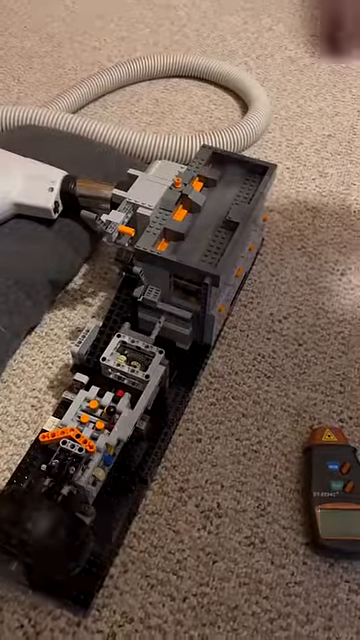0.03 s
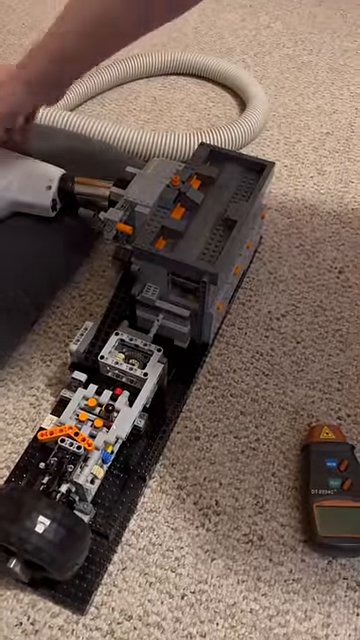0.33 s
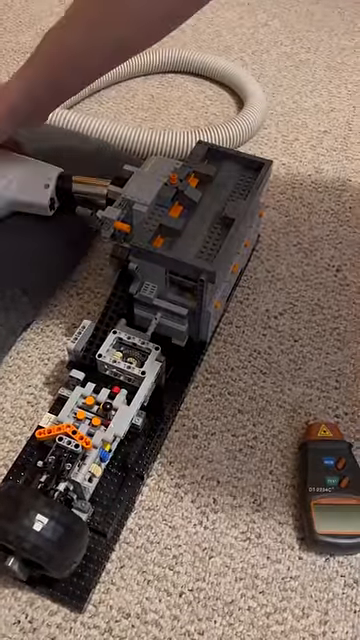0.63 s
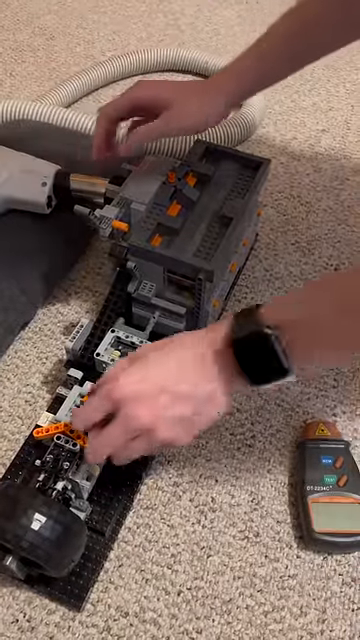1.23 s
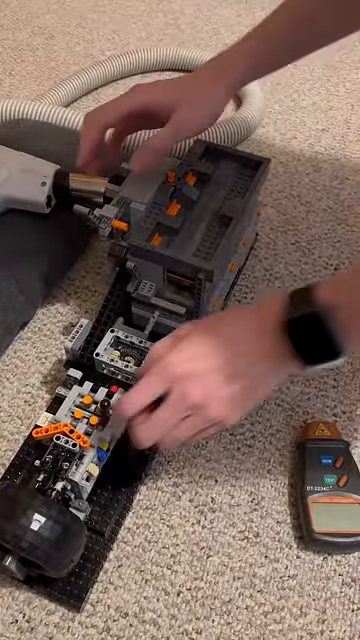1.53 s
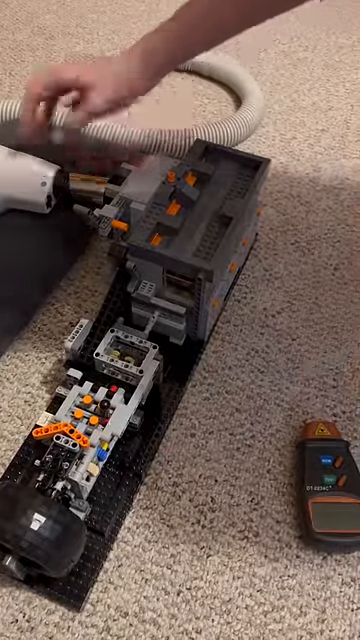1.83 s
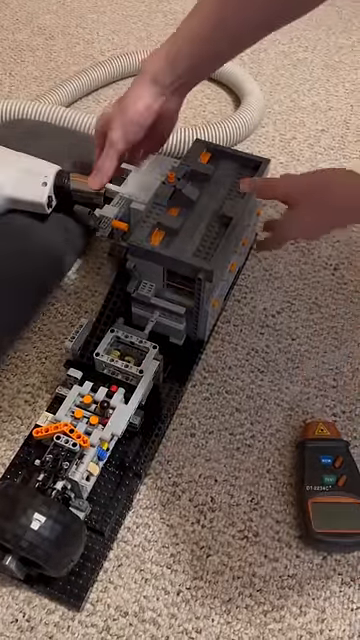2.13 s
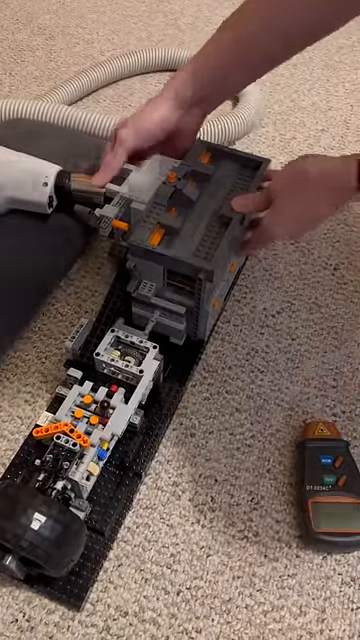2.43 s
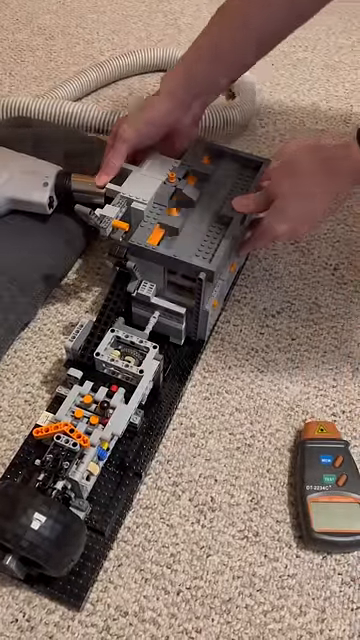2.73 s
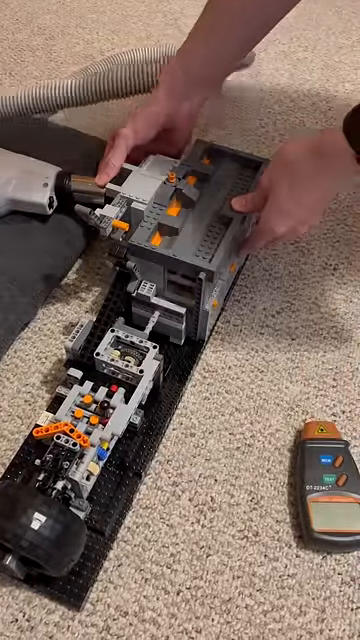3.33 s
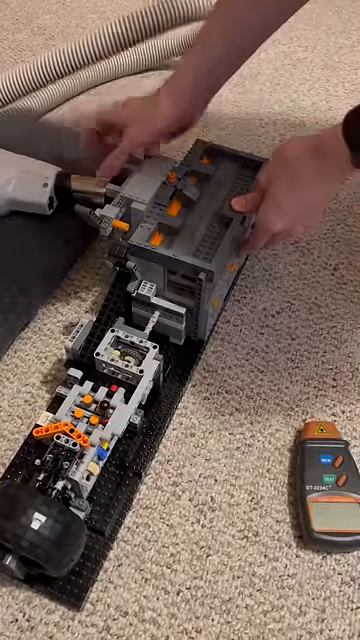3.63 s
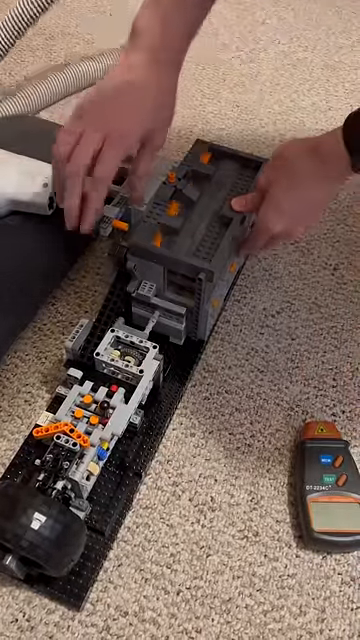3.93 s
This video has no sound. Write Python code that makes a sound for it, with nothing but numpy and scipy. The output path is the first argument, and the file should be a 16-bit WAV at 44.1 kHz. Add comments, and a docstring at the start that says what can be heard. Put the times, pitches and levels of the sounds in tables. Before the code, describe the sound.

A vacuum-driven toy brick engine hisses and starts up, clacking and chugging faster over rushing air.

```python
"""A toy engine of plastic bricks, driven by vacuum suction, on a carpet in a quiet room.
First sleeves rustle and plastic levers click over a low rumble and a faint, distant motor hum.
Near 2 s hands bump the model and the air valve opens with a turbulent hiss. Then the piston starts
and gathers speed: each turn is four clacks and gulps of air, coloured by the resonances of the
housing, over a growing rush of air and a rattle of loose bricks."""
import sys
import numpy as np
from scipy import signal
from scipy.fft import rfft, irfft, next_fast_len
from scipy.io import wavfile
from scipy.ndimage import uniform_filter1d, map_coordinates

SR = 44100
rng = np.random.default_rng(int(sys.argv[2]) if len(sys.argv) > 2 else 0)


def inscribe(sig):
    """Save sig as 16-bit PCM at rate SR to the path in sys.argv[1].

    A 1-D sig is mono; a 2-D sig holds one channel per row.
    Samples are clipped to [-1, 1] before scaling.
    """
    pcm = np.round(np.clip(np.atleast_2d(sig).T, -1, 1) * 32767)
    wavfile.write(sys.argv[1], SR, pcm.astype(np.int16))


N = 176400

# reverberation time of the room: frequency_hz, t60_s
ROOM_DECAY = [(200, .3), (1500, 0.18), (5000, 0.27), (9000, 0.2), (15000, 0.18)]
# stereo width of the room tail, close sounds and diffuse sounds: frequency_hz, side_over_mid_db
TAIL_WIDTH = [(150, -20.5), (350, -7), (700, -2), (1500, -4.5), (6000, -2.5)]
CLOSE_WIDTH = [(30, -26.5), (60, -22), (130, -21), (290, -21), (450, -13.5), (680, -4), (1300, -15.5),
               (2500, -15), (4400, -5.5), (7000, -4), (15000, -2.5)]
DIFFUSE_WIDTH = [(30, -24), (100, -10), (250, -12.5), (450, 0), (900, 1), (15000, -3.5)]
# partials of the distant motor: pitch_hz, level_db
HUM_PARTIALS = [(280, -78), (479, -71)]
# envelopes of room rumble, sleeve rustle, valve hiss and suction rush: time_s, level_db
RUMBLE_LEVEL = [(0, -62.5), (.3, -59), (.75, -61), (1, -61.5), (1.25, -62), (1.38, -68), (1.52, -74),
                (1.62, -65.5), (2, -55.5), (2.6, -57.5), (4, -46)]
RUSTLE_LEVEL = [(0, -67), (.25, -68), (.34, -57.5), (.48, -60), (.58, -66), (.64, -68), (.8, -60),
                (.92, -62), (1.05, -86.5), (1.2, -79), (1.39, -72), (1.5, -69.5), (1.58, -56), (1.66, -54),
                (1.72, -62.5), (1.86, -53), (2.1, -61)]
HISS_LEVEL = [(1.55, -120), (1.76, -72), (1.85, -61), (1.92, -49), (1.96, -41), (2.02, -37), (2.13, -34),
              (2.17, -39), (2.22, -49.5), (2.35, -61.5), (2.6, -90)]
RUSH_LEVEL = [(1.5, -120), (1.82, -77), (1.95, -49), (2.3, -46.5), (2.42, -41.5), (2.7, -40), (3.1, -36),
              (3.5, -33.5), (4, -33)]
# spectra of the same four noises: frequency_hz, gain_db
RUMBLE_SPECTRUM = [(25, -13), (45, 6), (80, -3), (160, -6), (290, 0), (410, -27.5), (500, -7), (620, -26.5),
                   (900, -45), (3000, -40.5), (8000, -40.5), (14000, -47), (15800, -52.5)]
RUSTLE_SPECTRUM = [(180, -38.5), (300, -6), (482, -5.5), (691, -14.5), (801, -10), (928, -14.5),
                   (1330, -17.5), (1570, -17), (3610, -22), (15000, -55)]
HISS_SPECTRUM = [(300, -20), (500, -32.5), (750, -20), (1000, -19.5), (1350, -3.5), (1550, -6.5),
                 (2000, -1.5), (2600, -5), (3300, -12.5), (3900, -1.5), (4800, 1.5), (6300, 1),
                 (7500, -2.5), (9000, -12), (11500, -16.5), (15500, -25)]
RUSH_SPECTRUM = [(30, -15), (100, 2), (300, 1.5), (700, 3), (1300, 2.5), (2500, 3.5), (3500, -3),
                 (7000, -2), (10000, -7), (12000, -6), (15500, -12)]
# a sleeve brushing past hose and carpet: middle_s, half_length_s, level_db
SCUFF_EVENTS = [(0.082, 0.026, -78), (0.34, .035, -74), (0.435, 0.083, -67), (0.545, 0.035, -77),
                (1.63, 0.087, -67.5), (1.773, 0.029, -63.5)]
# spectrum of the brushing cloth: frequency_hz, gain_db
SCUFF_SPECTRUM = [(500, -20), (2500, -12), (4000, 6), (5000, -8), (6500, 2.5), (9000, -8), (11000, -18.5),
                  (15000, -19)]
# hands bumping the model: start_s, level_db, pitch_hz, t60_s
BUMP_EVENTS = [(0.314, -47, 50, 0.18), (1.878, -30.5, 95, 0.11), (1.902, -38, 141, 0.11),
               (1.941, -38.5, 52, 0.32), (2.041, -46, 44.5, 0.33), (2.561, -37.5, 48.3, 0.23)]
# levers and hose being handled: start_s, level_db, tilt_db_per_octave, contact_s, pitch_ratio
CLICK_EVENTS = [(.425, -45.5, -4.5, 0.0022, 1.1), (.454, -45.5, -8.5, 0.0013, 0.96),
                (.534, -34, -6.5, 0.0019, 1.08), (.6726, -15, 0.5, 0.0019, 1.006),
                (.682, -35.5, 5, 0.007, 2.2), (.8585, -33.5, -7, 0.0026, 0.99),
                (.863, -45, -12.5, 0.0033, 1.1), (1.2215, -37, -4.5, 0.0047, 0.92),
                (1.278, -42.5, -3, .003, 1.3), (1.283, -39.5, -4.5, 0.0071, 0.82),
                (1.324, -46.5, -3, 0.0019, 1.07), (1.416, -47.5, -5.5, 0.0042, 0.91),
                (1.448, -49, -6, 0.0077, 1.6), (1.952, -34, 2, 0.0035, 1.2), (2.213, -34, -5, 0.0025, 1)]
# spectrum of a click's contact noise: frequency_hz, gain_db
CRACK_SPECTRUM = [(200, -21.5), (450, -10.5), (900, -1.5), (1400, 3), (2000, -3), (3300, -1), (5000, -4.5),
                  (7000, -1), (9800, -14), (12000, -18), (15500, -18.5)]
# modes of the handled plastic and of the piston knocking in its housing: pitch_hz, level_db, t60_s
PLASTIC_MODES = [(416, -23, 0.05), (1150, -6.5, 0.01), (1500, 1, 0.013), (2018, 0, .012), (2790, -5, 0.011),
                 (4410, 0, .010), (5300, -3, 0.0087), (6630, -14.5, 0.0052)]
PISTON_MODES = [(743, -8, 0.029), (1289, -1.5, .02), (1490, 0.5, 0.026), (2213, -1.5, 0.035),
                (2560, -2.5, 0.022), (2746, -5.5, 0.03)]
# turns of the crank: start_s, strength_db
CRANK_TURNS = [(2.23, -29.5), (2.391, -6.5), (2.556, -2.5), (2.700, 0), (2.824, -0.5), (2.946, 1),
               (3.061, 0), (3.167, 1), (3.274, 1.5), (3.374, 2.5), (3.475, 1), (3.571, 1), (3.666, 0.5),
               (3.76, 3), (3.853, 1), (3.948, 3.5), (4.04, -1)]
# contacts within a turn: share_of_turn, clack_db, gulp_db
TURN_STROKES = [(0, -26.5, -29.5), (.2, -31, -30.5), (.54, -37.5, -33.5), (.8, -39, -34)]
# response of the brick housing, and the tilts that clacks and gulps add: frequency_hz, gain_db
HOUSING_SPECTRUM = [(59, -50), (100, 5), (156, -19), (192, -0.5), (264, -9), (355, -9.5), (394, -4),
                    (447, -19.5), (497, -4), (843, -7.5), (956, -2), (1260, -3), (1730, -5.5), (2470, -3),
                    (3770, -8.5), (8410, -9), (10200, -18), (14500, -26), (15500, -12.5)]
CLACK_COLOUR = [(100, -2), (500, -6), (1400, -1), (2800, -0.5), (4000, -7), (8000, -2), (14000, -8)]
GULP_COLOUR = [(100, -4), (400, 2), (1400, 2), (2800, 1.5), (4000, 0), (8000, -5), (14000, -11.5)]


def amp(db):
    """Amplitude ratio: a factor of ten for every 20 dB."""
    return 10 ** (np.asarray(db) / 20)


def unit(x):
    """Normalisation to an rms of 1."""
    return x / np.sqrt(np.mean(x ** 2) + 1e-20)


def along(points, hz):
    """Interpolation of (frequency_hz, value) points on a logarithmic frequency axis."""
    frequencies, values = np.transpose(points)
    return np.interp(np.log(hz + 1), np.log(frequencies + 1), values)


def envelope(points):
    """Amplitude envelope through (time_s, level_db) points."""
    return amp(np.interp(np.arange(N) / SR, *np.transpose(points)))


def wobble(rate_hz):
    """Smooth random modulation: a spline through rate_hz Gaussian knots a second."""
    return map_coordinates(rng.standard_normal(2000), [np.arange(N) * rate_hz / SR], mode="wrap")


def filtered(x, response):
    """Linear filtering: the spectrum is multiplied by a frequency response."""
    size = next_fast_len(N + 8192)
    return irfft(rfft(x, size) * response(np.fft.rfftfreq(size, 1 / SR)), size)[..., :N]


def add(track, start_s, sound):
    """Superposition of a sound on a track."""
    start = max(0, round(start_s * SR))
    part = track[..., start:start + sound.shape[-1]]
    part += sound[..., :part.shape[-1]]


def noise(spectrum, tilt=((1, 0), (2, 0)), width=CLOSE_WIDTH, drift_db=2.2):
    """Partially coherent stereo noise of rms 1, with a drifting colour and a treble phase difference."""
    def colour(hz):
        return amp(along(spectrum, hz) + along(tilt, hz)) * [np.ones_like(hz), amp(along(width, hz))]

    def left_lead(hz, above_hz=5500, lead_rad=0.98):
        phase = lead_rad * (1 - 1 / (1 + (hz / above_hz) ** 10))
        return np.exp(.5j * np.outer([1, -1], phase))

    white = signal.stft(rng.standard_normal((2, N)), nperseg=1024)[2]
    patches = uniform_filter1d(rng.standard_normal(white.shape[1:]), size=4, axis=0)
    patches = uniform_filter1d(patches, size=8, axis=1)
    patchy = signal.istft(white * amp(drift_db * unit(patches)), nperseg=1024)[1][:, :N]
    mid, side = filtered(patchy, colour)
    return unit(filtered(np.array([mid + side, mid - side]), left_lead))


def ring(modes, t, pitch_ratio):
    """Free vibration: a sum of damped modes whose strengths and phases vary from blow to blow."""
    return sum(amp(db + rng.normal(0, 0.82)) * np.exp(-np.log(1000) * t / t60)
               * np.sin(2 * np.pi * (pitch_ratio * hz * t + rng.random())) for hz, db, t60 in modes)


def room(x, wet_db):
    """Reverberation: the direct sound plus a short, exponentially decaying tail, nearly mono in the bass."""
    hz, t, bands = signal.stft(rng.standard_normal((2, SR // 2)), SR, nperseg=256)
    decay = amp(-60 * t / along(ROOM_DECAY, hz)[:, None])
    width = np.array([np.ones_like(hz), amp(along(TAIL_WIDTH, hz))])[..., None]
    mid, side = signal.istft(bands * decay * width, SR, nperseg=256)[1]
    tail = np.array([mid + side, mid - side])
    delayed = np.pad(x.mean(0), (200, 0))[None]  # 4.5 ms
    return x + amp(wet_db) * signal.fftconvolve(delayed, tail / np.linalg.norm(tail[0]), axes=1)[:, :N]


def room_rumble():
    """Ambient noise: a diffuse field, strongest in the bass."""
    return envelope(RUMBLE_LEVEL) * amp(0.99 * wobble(9)) * noise(RUMBLE_SPECTRUM, width=DIFFUSE_WIDTH)


def motor_hum():
    """Phase modulation makes the two partials of a distant motor waver in each channel."""
    t = np.arange(N) / SR
    return sum(amp(db) * np.sqrt(2) * np.sin(2 * np.pi * hz * t + 0.35 * np.array([wobble(6), wobble(6)]))
               for hz, db in HUM_PARTIALS)


def sleeve_rustle():
    """Friction in moving cloth radiates a soft, fluttering noise."""
    return envelope(RUSTLE_LEVEL) * amp(1.7 * wobble(55)) * noise(RUSTLE_SPECTRUM, width=DIFFUSE_WIDTH)


def sleeve_scuffs():
    """Sliding friction of a sleeve on hose and carpet gives brief, bright, grainy swishes."""
    t = np.arange(N) / SR
    swell = sum(amp(db) * np.exp(-((t - middle_s) / half_s) ** 2) for middle_s, half_s, db in SCUFF_EVENTS)
    return swell * amp(1.6 * wobble(140)) * noise(SCUFF_SPECTRUM, width=DIFFUSE_WIDTH)


def hand_bumps(rise_s=0.0059):
    """Damped oscillation: hands press the model into the carpet, and each thud is one low mode."""
    out, t = np.zeros(N), np.arange(SR // 3) / SR
    for start_s, db, hz, t60 in BUMP_EVENTS:
        shape = np.exp(-np.log(1000) * t / t60) * (1 - np.exp(-t / rise_s))
        add(out, start_s, amp(db) * shape * np.sin(2 * np.pi * hz * t))
    return out


def lever_clicks(ring_db=-1, crack_db=1, cutoff_hz=260):
    """Impact excitation: each contact cracks and rings the plastic; small parts radiate little bass."""
    out, t = np.zeros((2, N)), np.arange(SR // 10) / SR
    grit, hz = noise(CRACK_SPECTRUM), np.fft.rfftfreq(len(t), 1 / SR)
    octaves = np.log2(np.clip(hz, 400, 8000) / 2000)
    radiation = hz ** 2 / (hz ** 2 + cutoff_hz ** 2)
    fade = 1 - t / t[-1]
    for k, (start_s, db, tilt, contact_s, pitch_ratio) in enumerate(CLICK_EVENTS):
        crack = grit[:, k * len(t):(k + 1) * len(t)] * np.exp(-t / contact_s)
        attack = 1 - np.exp(-t / (0.4 * contact_s))
        hit = (amp(ring_db) * ring(PLASTIC_MODES, t, pitch_ratio) + amp(crack_db) * crack) * attack
        radiated = irfft(rfft(hit) * amp(tilt * octaves) * radiation, len(t))
        add(out, start_s, amp(db) * radiated * fade)
    return room(out, wet_db=-6.5)


def valve_hiss():
    """Turbulence at the barely open valve is filtered by the nozzle's resonances."""
    return envelope(HISS_LEVEL) * amp(.7 * wobble(40)) * noise(HISS_SPECTRUM)


def suction_rush():
    """Turbulent flow through the whole engine makes a growing broadband noise."""
    return envelope(RUSH_LEVEL) * amp(0.6 * wobble(90)) * noise(RUSH_SPECTRUM)


def brick_rattle_power(t, rate_hz=170, decay_s=0.0029, softest_db=-40, spread_db=9.6, chances=900):
    """Incoherent addition: random impacts of loose bricks sum in power and follow the crank's strength."""
    power = np.zeros(N)
    starts, strengths = np.transpose(CRANK_TURNS)
    running_s = N / SR - starts[0]
    for when, chance, size in rng.random((chances, 3)):
        if chance < rate_hz * running_s / chances:
            hit_s = starts[0] + when * running_s
            db = softest_db + np.interp(hit_s, starts, strengths) + spread_db * size ** 2
            add(power, hit_s, (amp(db) * np.exp(-t / decay_s)) ** 2)
    return power


def engine(play_s=.003, scatter_db=1.8, knock_db=-1, clack_s=0.0023, gulp_rise_s=0.0038, gulp_fall_s=0.021):
    """Cyclic excitation of a resonant housing: piston and slide valve knock and gulp air in every turn."""
    clack_power, gulp_power, knocks = np.zeros((3, N))
    t = np.arange(SR // 6) / SR
    knock_attack = 1 - np.exp(-t / .0007)
    gulp_shape = (1 - np.exp(-t / gulp_rise_s)) * np.exp(-t / gulp_fall_s)
    starts, strengths = np.transpose(CRANK_TURNS)
    for start_s, period_s in zip(starts, np.diff(starts)):
        for share, clack_db, gulp_db in TURN_STROKES:
            late, hard, fullness_db, detune = rng.standard_normal(4)
            # play in the loose crank shifts every stroke but the first of a turn
            hit_s = start_s + share * period_s + play_s * late * (share > .1)
            turn_db = np.interp(hit_s, starts, strengths)
            force = amp(turn_db + clack_db + scatter_db * hard)
            knock = ring(PISTON_MODES, t, 1 + 0.026 * detune) * knock_attack
            add(knocks, hit_s, force * amp(knock_db) * knock)
            add(clack_power, hit_s, (force * np.exp(-t / clack_s)) ** 2)
            add(gulp_power, hit_s, (amp(turn_db + gulp_db + fullness_db) * gulp_shape) ** 2)
    clatter = np.sqrt(clack_power + brick_rattle_power(t)) * noise(HOUSING_SPECTRUM, CLACK_COLOUR)
    gulps = np.sqrt(gulp_power) * noise(HOUSING_SPECTRUM, GULP_COLOUR)
    return room(knocks + clatter + gulps, wet_db=-10)


def scene():
    """Superposition: the pressures of all sources add in each channel."""
    handling = lever_clicks() + hand_bumps() + sleeve_scuffs()
    machine = engine() + valve_hiss() + suction_rush()
    background = motor_hum() + sleeve_rustle() + room_rumble()
    return background + handling + machine


def record(dry):
    """Band limiting: the deepest bass and the highest treble are removed."""
    def passband(hz, low_hz=25, top_hz=15850, edge_hz=120):
        high_pass = hz ** 4 / (hz ** 4 + low_hz ** 4)
        low_pass = (1 - np.tanh((hz - top_hz) / edge_hz)) / 2
        return high_pass * low_pass

    return filtered(dry, passband)


dry = scene()
out = record(dry)
inscribe(out)
```